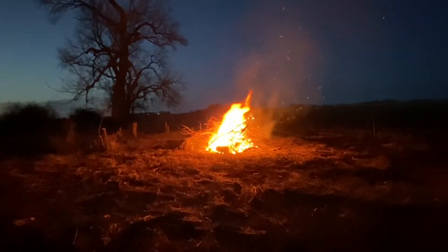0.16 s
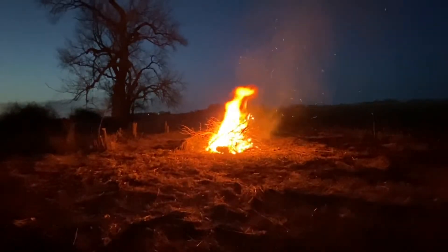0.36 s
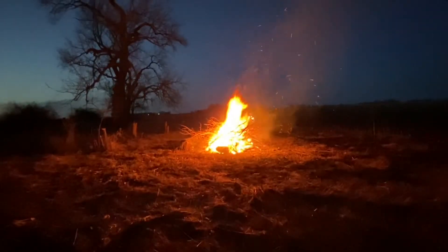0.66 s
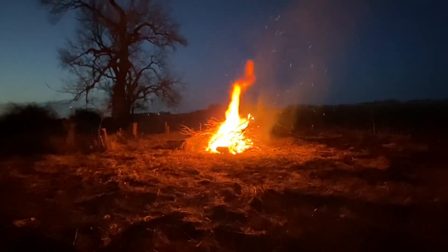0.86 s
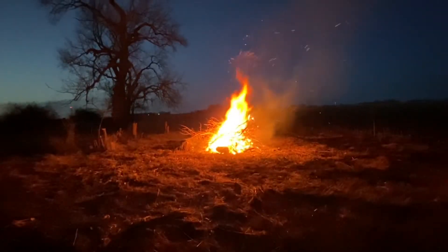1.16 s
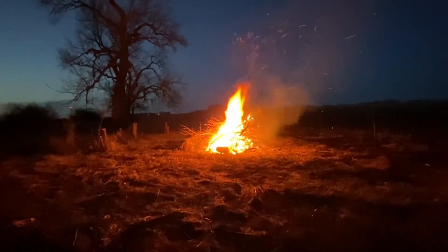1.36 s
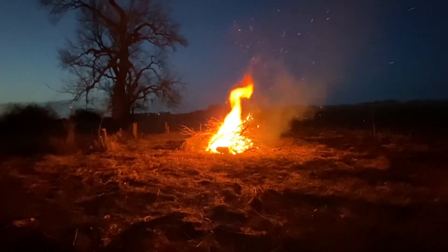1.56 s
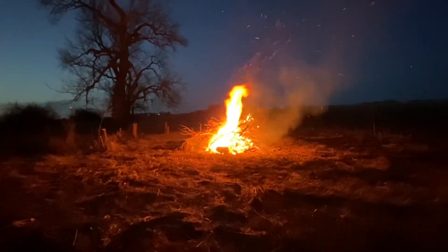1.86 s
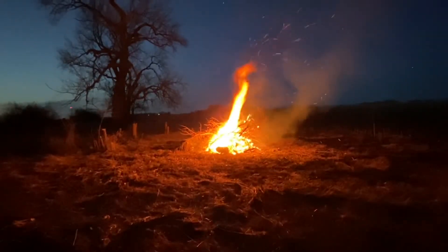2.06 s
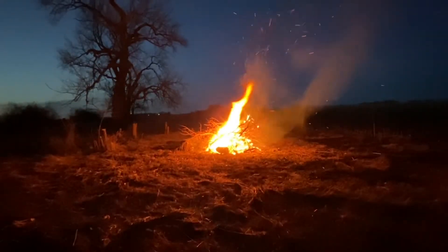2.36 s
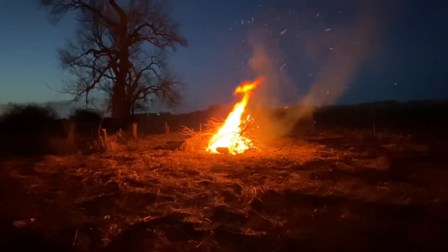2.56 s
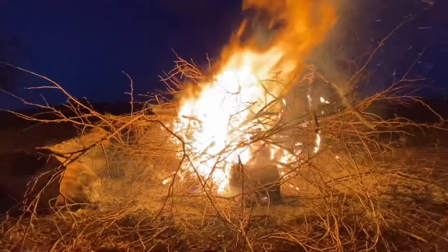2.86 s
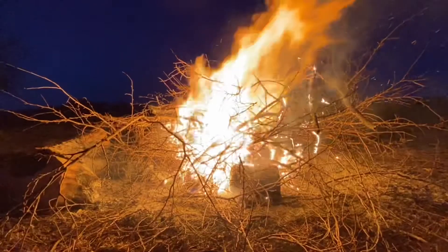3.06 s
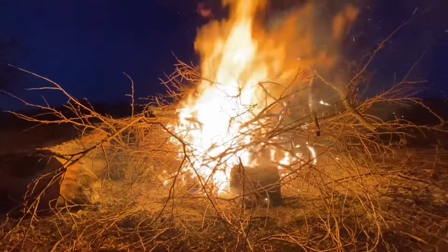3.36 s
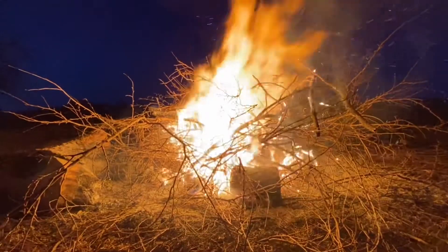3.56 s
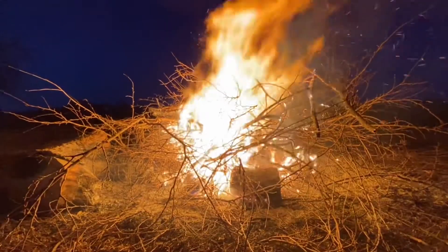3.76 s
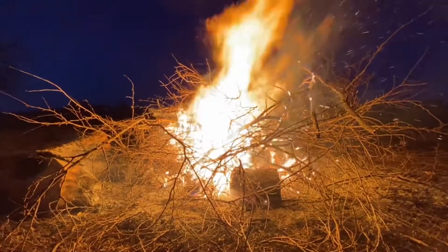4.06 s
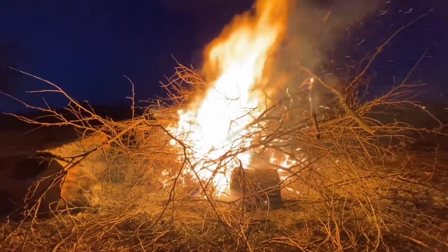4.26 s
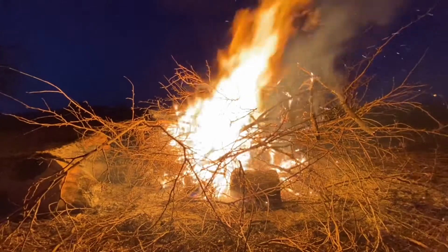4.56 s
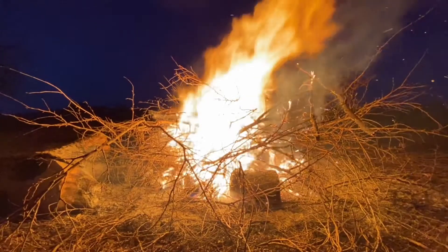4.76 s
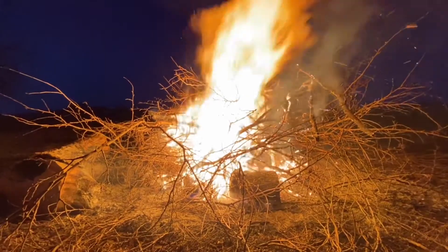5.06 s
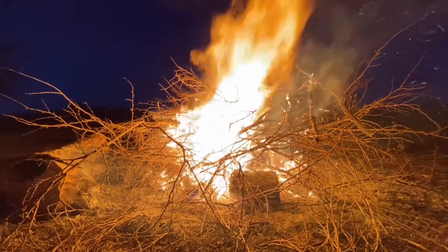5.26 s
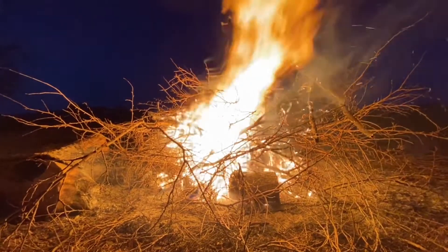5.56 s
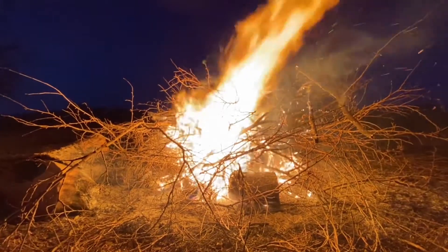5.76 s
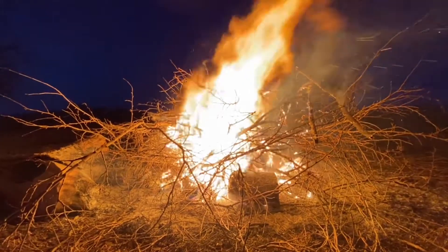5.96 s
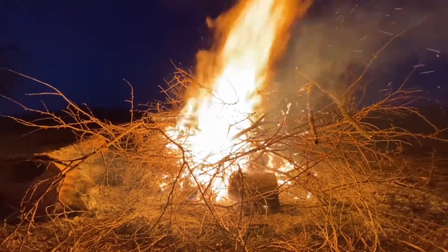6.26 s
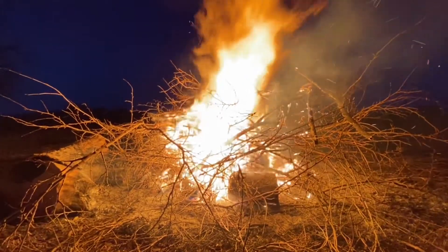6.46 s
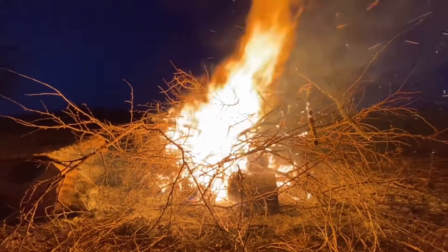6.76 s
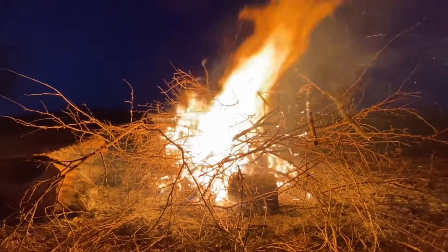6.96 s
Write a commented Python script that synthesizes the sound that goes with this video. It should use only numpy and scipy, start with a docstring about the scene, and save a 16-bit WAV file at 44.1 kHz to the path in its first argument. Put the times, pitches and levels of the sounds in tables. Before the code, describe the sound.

Sparse, soft crackle of a distant brush fire, then after a quick dip the same fire close up, densely snapping and popping over a low flame rumble.

```python
"""First a far fire of dry brush in a field: sparse pops over a soft hiss; after a quick fade, the same close by.
Twigs pop as shaped noise bursts around a sharp shock, over a dense crackle of small, mostly faint ones.
Flames rumble and hiss as patchy filtered noise; boiling sap whistles twice as a gliding tone with its octave.
A breeze thumps the microphone in puffs of low noise. The recorder loses one short block of sound."""
import sys
import numpy as np
from scipy import signal
from scipy.fft import rfft, irfft, next_fast_len
from scipy.io import wavfile
from scipy.ndimage import uniform_filter1d, map_coordinates

SR = 44100
rng = np.random.default_rng(int(sys.argv[2]) if len(sys.argv) > 2 else 0)


def store_wav(level_fs):
    """Save 16-bit WAV to argv[1]."""
    pcm = np.round(np.clip(np.atleast_2d(level_fs), -1, 1) * 32767)
    wavfile.write(sys.argv[1], SR, pcm.T.astype(np.int16))


N = 314244
T = np.arange(N) / SR  # time of each sample, s
MOVE_S = 2.37  # the listening place changes from far to near


# The loud pops, each level giving the energy of that level held for 1 ms, before tone by distance and panning:
# [t/s, thin-wood snap level/dB, thick-wood body level/dB, length/ms, own tone f/Hz]
POP_EVENTS = [(0.1043, -27.5, -40.5, 8.9, 6300), (0.1951, -28, -36, 1.7, 5400),
              (0.3292, -35.5, -42, 2.9, 11170), (0.5047, -31, -40, 3.4, 12000),
              (0.7107, -36.5, -43.0, 3.8, 12000), (0.7302, -30, -38.0, 2.4, 7400),
              (0.857, -36, -42.5, 5.0, 4070), (0.9492, -31.5, -44.5, 4.8, 12000),
              (1.062, -45, -37.5, 4.5, 2310), (1.0744, -36.5, -46, 8.8, 7260),
              (1.2297, -43, -36.5, 2.1, 1430), (1.2838, -41, -42.5, 1.2, 4000),
              (1.5433, -28.0, -42, 2.6, 5260), (1.603, -38.5, -40, 2.2, 1630),
              (1.7757, -27.5, -21.5, 10.7, 1390), (1.917, -48, -44, 2.5, 2580),
              (2.0932, -31.5, -33, 2.8, 2530), (2.3082, -38.5, -45, 6.2, 6200),
              (2.422, -46, -28.5, 3.8, 1930), (2.498, -19, -24.5, 4.8, 1460),
              (2.531, -22.5, -31, 2.2, 6350), (2.6147, -23, -38, 4.6, 7800),
              (2.6288, -22.5, -33.0, 7.5, 7900), (2.6909, -22.5, -31, 7.2, 7860),
              (2.7219, -16.0, -27, 2, 11400), (2.895, -30.5, -32, 2.4, 2100), (2.9155, -25, -40, 2, 11170),
              (2.9788, -22.5, -27, 2.5, 8450), (3.077, -8, -19.0, 3.7, 9010),
              (3.087, -25, -24.5, 3.3, 6300), (3.2154, -19.5, -24, 3.7, 5450), (3.2343, -19, -17, 11, 5500),
              (3.2867, -19.5, -21.5, 1.5, 6760), (3.3568, -15, -26, 2.5, 11170),
              (3.3931, -19, -26, 2.4, 5000), (3.4157, -26, -32.0, 2.3, 6290),
              (3.4766, -26.5, -32.0, 3.7, 12000), (3.5429, -26, -26, 5.4, 4500),
              (3.5557, -14.5, -22, 8, 7900), (3.5775, -26, -26.5, 2.9, 1730),
              (3.6261, -24, -29.5, 3.5, 12000), (3.64, -17, -24.0, 4.9, 7050), (3.783, -36, -28, 3.0, 2450),
              (3.8606, -19, -31.0, 2.7, 8450), (3.9296, -8.5, -17, 3.9, 6400),
              (3.9865, -26.0, -32, 5.5, 7500), (4.0092, -21.5, -18, 4.6, 3960),
              (4.0226, -26, -29, 3.5, 3570), (4.0595, -13.5, -17, 3.1, 3140), (4.102, -23, -27, 2, 4720),
              (4.1266, -11.5, -12, 2.2, 2620), (4.199, -30, -26.5, 1.6, 2680),
              (4.2204, -23, -25.0, 3.1, 1470), (4.2746, -17.5, -21.5, 2.6, 2550),
              (4.3115, -22.5, -29, 2.3, 8600), (4.379, -20.5, -31.5, 5.0, 12100),
              (4.4847, -21, -33, 6.9, 6700), (4.5545, -8.5, -15.5, 3.5, 4800), (4.629, -11, -20, 2.9, 6600),
              (4.723, -21, -22, 2.4, 2150), (4.8108, -13, -24.0, 2.9, 12100),
              (4.8247, -8.5, -17, 2.05, 6200), (4.9211, -16.5, -22, 2.3, 5700),
              (4.9341, -20.5, -32.5, 2.9, 7840), (4.966, -21.5, -28.5, 1.9, 6290),
              (5.0039, -21.5, -32, 1.7, 6600), (5.0529, -20.5, -36, 2, 12000),
              (5.2904, -28, -25, 4.5, 1490), (5.319, -18, -29, 2.9, 6760), (5.366, -22, -33.5, 3.3, 4670),
              (5.4229, -17.5, -33, 2.5, 12100), (5.4443, -20.5, -29, 2.2, 6800),
              (5.6065, -19.0, -32, 10, 4720), (5.6224, -22.5, -23, 7.1, 1500),
              (5.6456, -20, -22, 1.8, 3000), (5.651, -13.5, -18.5, 3, 2610), (5.6674, -23, -28, 7.6, 3550),
              (5.6908, -17.5, -26, 1.9, 6000), (5.7156, -13, -16.5, 1.9, 2130),
              (5.7204, -6.5, -18.5, 4.8, 8600), (5.782, -13, -10.5, 1.4, 4530),
              (5.8097, -28, -29.5, 2.5, 12000), (5.9076, -20.5, -22, 2.8, 1640),
              (5.9638, -20.5, -30.5, 2.6, 5900), (6.045, -19, -25.5, 3.0, 7300),
              (6.0662, -15.5, -30, 6.2, 8000), (6.0918, -15, -24.5, 4.6, 5240),
              (6.189, -22.5, -34, 2.3, 4720), (6.242, -30, -38, 3.1, 9000), (6.512, -28, -39, 4, 10900),
              (6.5697, -27, -34, 4.5, 12000), (6.625, -25.5, -35.5, 8.0, 8650),
              (6.6773, -19.5, -36.5, 4.1, 12300), (7.0732, -26, -32, 6.1, 2860),
              (7.0954, -8.5, -18.5, 3.1, 11600)]


def pops():
    """Pockets of steam burst the larger twigs."""
    return bursts(*np.transpose(POP_EVENTS), shock=6)


TICK_DB, TICK_SPREAD_DB = 5, 4.5  # crackle over the hiss level, spread of sizes
RAREST = 0.031  # bounds the size of the loudest ticks
TICK_BODY_DB, TICK_COLOUR_DB = -8.5, 21.5  # body relative to snap, and its range from tick to tick
TICK_MS, TICK_LONGER_MS = 1.26, 4.9  # shortest tick, most added length


def crackle(hiss_db, count=620):
    """Thin twigs tick at chance moments, mostly faint, louder where the fire hisses more."""
    chance = rng.random((count, 5))
    s = chance[:, 0] * (N - 1) / SR
    fire_db = hiss_db + 3 * wobble(7.6)  # the wobble makes louder and fainter clumps
    size_db = TICK_DB - TICK_SPREAD_DB * np.log(RAREST + chance[:, 1])
    snap_db = fire_db[(s * SR).astype(int)] + size_db
    body_db = snap_db + TICK_BODY_DB + TICK_COLOUR_DB * (chance[:, 2] - .5)
    length_ms = TICK_MS + TICK_LONGER_MS * chance[:, 3] ** 3
    tone_hz = 1500 * 8 ** chance[:, 4]
    return bursts(s, snap_db, body_db, length_ms, tone_hz, shock=5.0)


# Thick wood: [f/Hz, relative level/dB]
BODY_COLOUR = [(250, -11.5), (780, -10.5), (1050, -4), (2200, 0), (3300, -3.5), (6500, -25.5)]
# Thin wood: [f/Hz, relative level/dB]
SNAP_COLOUR = [(1500, -39), (3400, -7.5), (6400, 0.5), (9800, -5.5), (12000, -7), (15800, -10.5),
               (16600, -50)]
# Colour of bursts heard at the far place: [f/Hz, gain/dB]
FAR_AIR = [(1050, 5.5), (2300, -2.5), (4000, 3), (7500, -5), (11000, 2)]
# Left-right likeness at the far place, for bursts here and flames below: [f/Hz, correlation]
FAR_LIKENESS = [(200, 1), (700, 0.5), (3500, 0.59), (6500, 0.23)]
# Left-right likeness at the near place, for bursts here and flames below: [f/Hz, correlation]
NEAR_LIKENESS = [(60, 0.1), (300, 0.72), (1800, 0.55), (3300, 0.14), (6800, 0.29)]
OWN_COLOUR_DB = 1.5  # how far each burst's tone colour strays from that of its wood
OWN_PEAK_DB, OWN_PEAK_WIDTH = 8.5, .22  # a burst's own tone: height, width in log Hz


def bursts(s, snap_db, body_db, length_ms, tone_hz, shock):
    """Each burst is a shock and a ragged run of splinters; the shorter the run, the more the shock stands out."""
    t = np.arange(1200) / SR - .004  # 4 ms before the shock are kept for the lead-in
    length = np.clip(length_ms, .3, 12)[:, None] / 1000  # s
    ragged = amp(13.7 * uniform_filter1d(rng.standard_normal((len(s), len(t))), size=16))
    tearing = 0.18 * np.exp(np.minimum(t, 0) / length)  # a faint lead-in
    decay = np.exp(-1.3 * t / length) + 0.16 * np.exp(-t / 0.0052)
    swell = np.where(t < 0, tearing, decay)
    impulse = shock * (0.0023 / length) ** 1.3 * (np.abs(t) < .5 / SR)
    path_delay_s = .00015 * rng.standard_normal((len(s), 1))  # between the two paths, widens the burst

    hz = np.fft.rfftfreq(len(t), 1 / SR) + 1
    stray = unit(uniform_filter1d(rng.standard_normal((len(s), len(hz))), size=45))
    tone = np.exp(-.5 * (np.log(hz / tone_hz[:, None]) / OWN_PEAK_WIDTH) ** 2)
    own = amp(OWN_COLOUR_DB * stray) * amp(OWN_PEAK_DB * tone)

    pair = np.zeros((2, N))
    for colour, level in ((BODY_COLOUR, body_db), (SNAP_COLOUR, snap_db)):
        for path in (0, 1):
            wave = swell * ragged * rng.standard_normal(swell.shape) + impulse
            wave = irfft(rfft(wave) * own * rfft(causal(colour), len(t)), len(t))
            # energy of the level held for 1 ms
            wave *= (amp(level) * np.sqrt(SR / 1000) / np.linalg.norm(wave, axis=1))[:, None]
            at = np.round((s[:, None] + path * path_delay_s + t) * SR).astype(int).clip(0)
            pair[path] += np.bincount(at.ravel(), wave.ravel(), N + SR)[:N]

    through_air = filtered(pair, lambda hz: amp(along(FAR_AIR, hz)))
    far = ports(through_air, FAR_LIKENESS) * amp([[1.1], [-1.1]])
    near = ports(pair, NEAR_LIKENESS) * amp([[-1.3], [1.3]])
    return np.where(T > MOVE_S, near, far)


# Rumble of the flames at either place: [f/Hz, relative spectral level/dB]
RUMBLE_SPECTRUM = [(15, -50), (28, -13.5), (59, 2.5), (107, 1), (261, -12), (500, -27.5), (900, -60)]
# Hiss at the far place: [f/Hz, relative spectral level/dB]
FAR_HISS_SPECTRUM = [(150, -35), (300, 15), (620, 20), (850, 8.5), (1900, -0.5), (5500, -6), (11000, -3.5),
                     (15800, -6), (16200, -40)]
# Hiss at the near place: [f/Hz, relative spectral level/dB]
NEAR_HISS_SPECTRUM = [(150, -31), (300, 7.5), (620, 11.5), (820, 5), (2300, 2), (3300, -1.5), (6600, 3.5),
                      (9800, -5), (12500, -1), (15800, -4.5), (16200, -42)]
HISS_FAR_DB, HISS_NEAR_DB = 4, 0.08  # hiss gain over the strength curve at each place


def flames(rumble_db, hiss_db):
    """Tumbling hot gas rumbles; the burning bark hisses."""
    def by_place(far_spectrum, near_spectrum, patchy_db):
        """Rushing noise with the colour and width of each listening place."""
        far = rush(far_spectrum, FAR_LIKENESS, patchy_db)
        near = rush(near_spectrum, NEAR_LIKENESS, patchy_db)
        return np.where(T < MOVE_S, far, near)

    tumble_db = 0.99 * wobble(25) + 1.38 * wobble(6)
    rumble = amp(rumble_db + tumble_db) * by_place(RUMBLE_SPECTRUM, RUMBLE_SPECTRUM, 2.4)
    place_db = np.where(T < MOVE_S, HISS_FAR_DB, HISS_NEAR_DB)
    hiss = amp(hiss_db + place_db) * by_place(FAR_HISS_SPECTRUM, NEAR_HISS_SPECTRUM, 3.7)
    return rumble + hiss * amp([[-.6], [.6]])


# Two boiling twigs, one list each, before wobble and panning: [t/s, pitch f/Hz, level/dB]
WHISTLE_GLIDES = [
    [(.104, 6650, -52), (.132, 5969, -41), (.17, 5898, -42), (.22, 5910, -51), (.33, 6120, -62)],
    [(2.65, 9200, -62), (2.84, 9150, -60), (2.96, 8400, -64), (3.01, 8100, -56), (3.07, 8250, -74)],
]


def whistle(rows):
    """Steam from a boiling twig sings a gliding tone with a weak octave."""
    start_s, end_s = rows[0][0], rows[-1][0]
    pitch_hz, db = curves(rows)
    phase = 2 * np.pi * np.cumsum(pitch_hz * (1 + 0.002 * wobble(140))) / SR
    on = (T > start_s) & (T < end_s)
    sung = np.sin(phase) + amp(-24) * np.sin(2 * phase)
    tone = np.sqrt(2) * on * amp(db + 2.3 * wobble(60)) * sung
    pan_db = [[2.5], [-2.5]] if start_s < MOVE_S else [[-1.2], [1.2]]
    return tone * amp(pan_db)


# Puffs of breeze on the microphone: [t/s, peak level/dB]
BREEZE_PUFFS = [(1.117, -38.5), (1.444, -44.5), (1.513, -34.5), (1.58, -39.5), (1.64, -34), (1.926, -38.5)]
# Colour of the thump: [f/Hz, relative spectral level/dB]
THUMP_SPECTRUM = [(60, -13), (200, 5), (650, -7), (900, -45)]
PUFF_S = 0.0091  # time constant of a puff's rise and fall


def breeze():
    """Puffs of air thump both microphone ports nearly alike with low noise."""
    push = sum(amp(db) * np.exp(-np.abs(T - s) / PUFF_S) for s, db in BREEZE_PUFFS)
    return push * rush(THUMP_SPECTRUM, [(200, 1.0)], patchy_db=-0.5)


# In the top treble the two sides are by turns opposed and in step: [f/Hz, correlation]
TOP_LIKENESS = [(8000, -0.075), (9300, -0.53), (10300, 0.35), (11600, 1), (12700, -0.78), (13900, -0.68),
                (14700, 0.38)]


def ports(pair, alike):
    """Left and right by mid and side from two sounds; unrelated ones become as alike as the table says."""
    def turn(hz):
        return np.arccos(np.clip(along(alike + TOP_LIKENESS, hz), -1, 1)) / 2

    mid, side = filtered(pair, lambda hz: np.array([np.cos(turn(hz)), np.sin(turn(hz))]))
    return np.array([mid + side, mid - side])


def rush(spectrum, alike, patchy_db):
    """Stereo noise of rms 1 with patches of random gain in time and frequency."""
    z = signal.stft(rng.standard_normal((2, N)), nperseg=512)[2]
    patches = uniform_filter1d(rng.standard_normal(z.shape[1:]), size=5, axis=0)
    patches = unit(uniform_filter1d(patches, size=6, axis=1))
    flutter = unit(uniform_filter1d(rng.standard_normal(z.shape[2]), size=5))  # common to all frequencies
    field = patches + 1.22 * flutter
    depth_db = patchy_db * np.linspace(0, 1, len(field))[:, None] ** 0.26  # the bass stays steadier
    pair = signal.istft(z * amp(depth_db * field), nperseg=512)[1][:, :N]
    coloured = filtered(pair, lambda hz: amp(along(spectrum, hz)))
    return unit(ports(coloured, alike))


def causal(spectrum):
    """The minimum-phase impulse response of a spectrum, energy 1, by folding its cepstrum."""
    cep = irfft(np.log(amp(along(spectrum, np.fft.rfftfreq(1024, 1 / SR)))))
    cep[1:512] *= 2
    cep[513:] = 0
    h = irfft(np.exp(rfft(cep)))[:512]
    return h / np.linalg.norm(h)


def filtered(x, response):
    """x times a response of frequency."""
    m = next_fast_len(N + 8192)
    return irfft(rfft(x, m) * response(np.fft.rfftfreq(m, 1 / SR)), m)[..., :N]


def wobble(rate):
    """A smooth random curve, rate knots a second."""
    return map_coordinates(rng.standard_normal(int(N * rate / SR) + 4), [T * rate])


def curves(rows):
    """One value per sample for each column after the time."""
    s, *cols = np.transpose(rows)
    return [np.interp(T, s, c) for c in cols]


def along(points, hz):
    """(Hz, value) points interpolated on a log axis."""
    f, v = np.transpose(points)
    return np.interp(np.log(hz + 1), np.log(f + 1), v)


def unit(x):
    """x at rms 1."""
    return x / np.sqrt(np.mean(x ** 2) + 1e-20)


def amp(db):
    """Gain of a level in dB."""
    return 10 ** (np.asarray(db) / 20)


# Strength of the fire, far then near, before wobble and hiss gain: [t/s, rumble level/dB, hiss level/dB]
FIRE_STRENGTH = [(0, -54.5, -60.5), (.6, -49, -61), (.95, -48, -60), (1.07, -42, -64.5), (2, -46, -61),
                 (2.36, -50, -63.5), (2.38, -33, -43), (2.9, -34.5, -46.5), (3.4, -32.5, -45.5),
                 (3.53, -38, -46.5), (3.9, -32, -45), (4.7, -33, -45), (6.85, -33.5, -48),
                 (7.13, -32.5, -49.5)]


def scene():
    """Pops, crackle and flames of one fire, with whistles and breeze."""
    rumble_db, hiss_db = curves(FIRE_STRENGTH)
    fire = pops() + crackle(hiss_db) + flames(rumble_db, hiss_db)
    return fire + sum(whistle(rows) for rows in WHISTLE_GLIDES) + breeze()


FADE_OUT_S, FADE_IN_S = 0.041, 0.059  # before and after the move
LOST_FROM_S, LOST_TO_S = 4.4612, 4.4848  # the lost block
TOP_HZ = 16500  # band limit


def record(dry):
    """A fade out and in at the move, one lost block, soft clipping near full scale, then the band limit."""
    fade = np.clip(np.maximum((MOVE_S - T) / FADE_OUT_S, (T - MOVE_S) / FADE_IN_S), 0, 1)
    kept = (T < LOST_FROM_S) | (T > LOST_TO_S)
    clipped = .9 * np.tanh(dry * fade * kept / .9)
    return filtered(clipped, lambda hz: hz < TOP_HZ)


dry = scene()
out = record(dry)
store_wav(out)
```